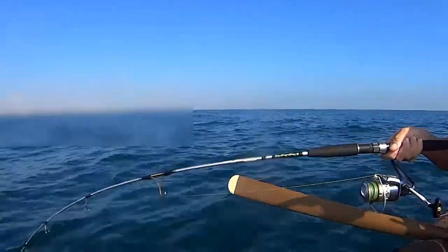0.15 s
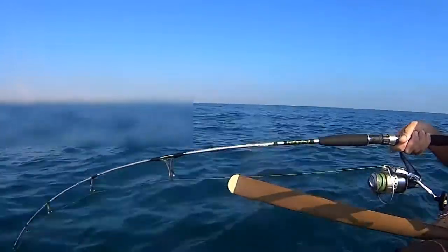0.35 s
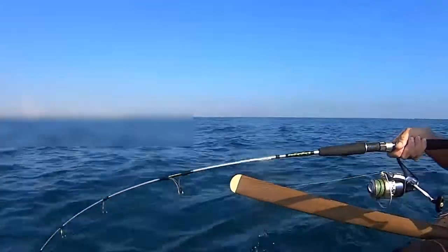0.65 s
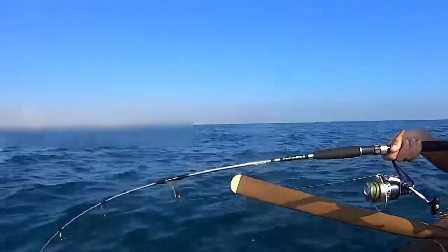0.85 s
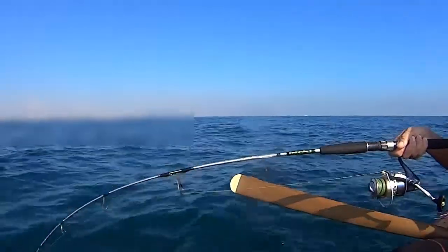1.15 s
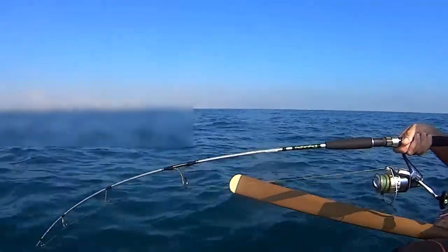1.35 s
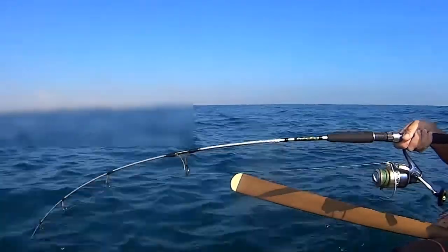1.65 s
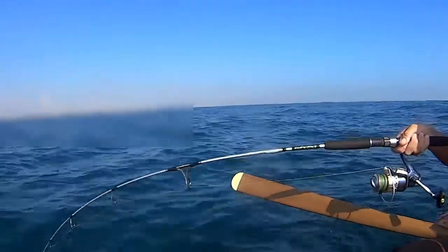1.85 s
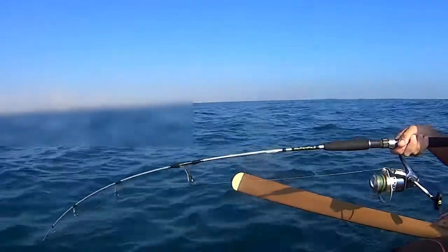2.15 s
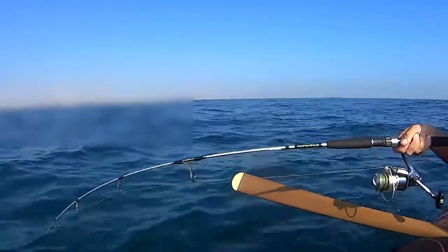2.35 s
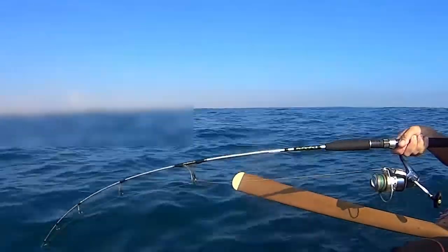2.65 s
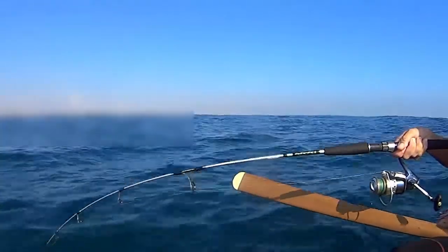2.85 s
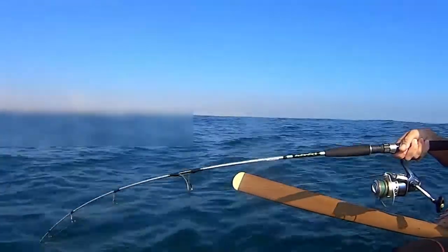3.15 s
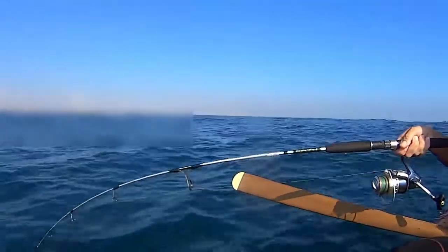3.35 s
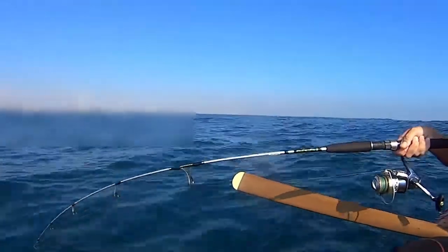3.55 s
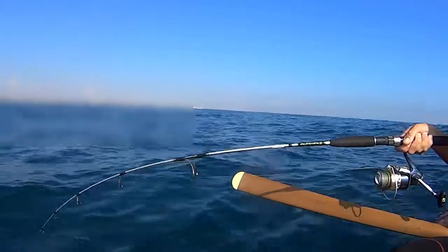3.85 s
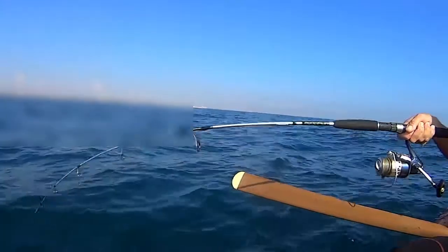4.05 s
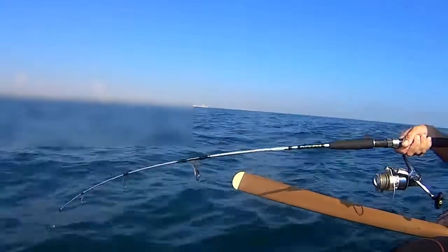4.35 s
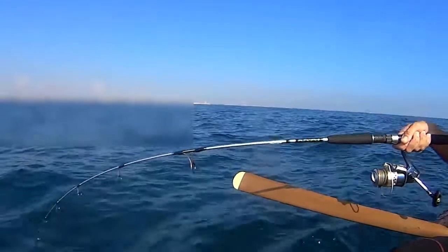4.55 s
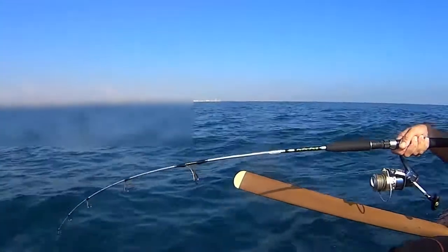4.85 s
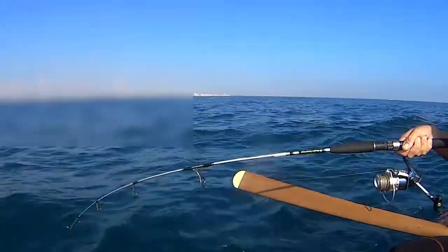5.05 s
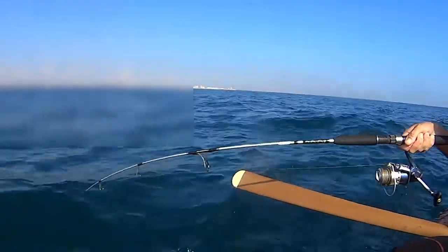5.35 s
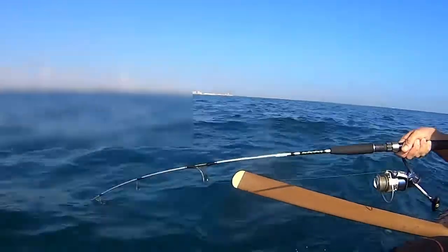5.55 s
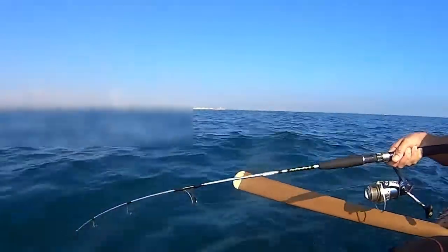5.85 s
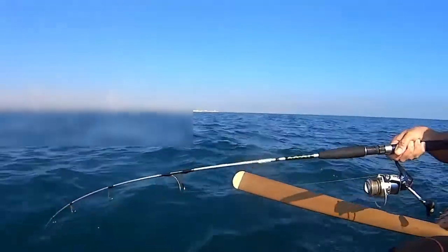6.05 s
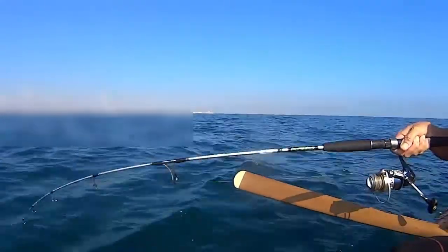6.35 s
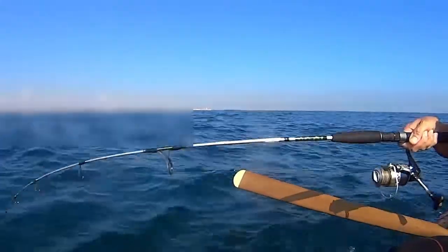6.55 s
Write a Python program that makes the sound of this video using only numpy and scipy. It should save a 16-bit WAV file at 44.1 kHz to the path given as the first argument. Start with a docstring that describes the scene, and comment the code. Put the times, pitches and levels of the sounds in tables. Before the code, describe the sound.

A fishing reel's drag buzzes in uneven metallic runs on a kayak at sea, with hollow plastic knocks, small water laps and drips.

```python
"""A drag clicker buzzes in runs as a fish strips line from a spinning reel on a kayak at sea.
The pull on the line drives the ringing spool, the rasping frame and the snapping clicker tongue.
Close to the microphone of a small cased camera on the hull, wavelets and gear knock the hollow plastic,
modelled as struck modes; random slaps make the lapping, gliding tones the drips, banded noise a faint hiss."""
import sys
import numpy as np
from scipy import signal
from scipy.io import wavfile
from scipy.ndimage import uniform_filter1d

SR = 44100
rng = np.random.default_rng(int(sys.argv[2]) if len(sys.argv) > 2 else 0)


def digitize_waveform(pressure):
    """Quantize a signal to 16-bit integers and store it at the path in sys.argv[1].

    Rows of a 2-D input are taken as channels; values are limited to [-1, 1].
    """
    field = np.atleast_2d(pressure).T
    bounded = np.clip(field, -1, 1)
    quanta = np.round(bounded * 32767).astype(np.int16)
    wavfile.write(sys.argv[1], SR, quanta)


def attenuation_scalar(level_db):
    """Turn a level in dB into a linear amplitude multiplier (20 dB per decade)."""
    decades = np.asarray(level_db, float) / 20
    return 10 ** decades


N = 295911

# low modes of the spool: hz, width_hz (of the narrower resonance), level_db
SPOOL_MODES = [(1342.6, 47, -4.5), (1700, 78, 8), (1830, 51, -4), (1600, 45, -4)]
# knocks on the hull: start_s, peak_db, place (1 belly, 2 wall, 3 rim, 4 edge),
# loss_db (per region away from the place), contact_t60_s (held to 0.005-0.3)
HULL_KNOCKS = [(0.038, -40.5, 2.83, 11, .13), (0.315, -43.5, 0.97, 2, 0.13), (0.332, -38.5, 1.26, 8, 0.039),
               (0.624, -50.5, 2.5, 0, .027), (0.688, -43, 1.3, 2, 0.073), (0.793, -42, 3, 9.5, 0.21),
               (0.922, -49.5, 0.73, 1.5, 0.16), (1.038, -47, 2.3, 8, 0.37),
               (1.129, -35.5, 1.54, 3.5, 0.034), (1.391, -33, 1.63, 9, 0.1), (1.502, -18, 0.56, 10, 0.076),
               (1.804, -29.5, 1.1, 6, 0.041), (2.406, -51, 1.8, 8, 0.063), (2.656, -36.5, 2.6, 3, 0.03),
               (2.729, -41, 1.9, 7, .05), (2.847, -55, 1, 10, 0.17), (3.084, -40, 2, 2, 0.041),
               (3.209, -31.5, 1.23, 3.5, 0.085), (3.277, -12, 1.7, 4.5, 0.16),
               (3.318, -18.5, 2.5, 8.5, 0.09), (3.342, -24, 2.25, 9.5, 0.085),
               (3.367, -24, 2.63, 9.5, 0.029), (3.514, -27.5, 1.77, 6, 0.058),
               (3.63, -31, 2.29, 14.5, 0.017), (3.739, -45, 2.7, 9, 0.13), (3.805, -10, 2.8, 9.5, 0.025),
               (3.917, -28, 1.94, 6, 0.12), (4.09, -42, 2.1, 6, 0.07), (4.207, -27, 1.83, 11.5, 0.097),
               (4.282, -28.5, 1.82, 14, 0.014), (4.362, -37.5, 3.47, 9, 0.037),
               (4.398, -34, 1.98, 14.5, 0.029), (4.436, -57.5, 1, 10, .15), (4.471, -26, 1.23, 10.5, 0.04),
               (4.58, -44, 1.8, 14, 0.036), (4.664, -37.5, 2.1, 3.5, 0.068), (4.724, -35.5, 3.46, 9, 0.13),
               (5.031, -49.5, 1, 8, 0.043), (5.075, -39.5, 2.52, 15, 0.23), (5.232, -32, 1.44, 7, 0.069),
               (5.418, -50.5, 2.8, 10, .068), (5.558, -57.5, 0.75, 3.5, 0.42),
               (5.649, -47.5, 1.6, 6.5, 0.068), (5.936, -45.5, 3.3, -0.5, 0.038),
               (5.994, -41.5, 0.77, 6, .058), (6.024, -19.5, 2.86, 13.5, 0.014),
               (6.035, -24.5, 2.08, 9, 0.058), (6.134, -29.5, 1.53, 5.5, 0.13), (6.177, -43, 3.6, 1.5, .05),
               (6.198, -33.5, 1.45, 8, 0.073), (6.285, -41.5, 1.9, 6, .04), (6.303, -50, 3.8, -2.5, .04),
               (6.325, -34.5, 1, 9, 0.06), (6.45, -47, 3.6, 1.5, 0.054), (6.7, -37, 1.2, 6.5, .094)]
# lowest modes of the whole hull: hz, level_db, t60_s, likeness (left to right, 0-1)
HULL_BOOM = [(36, -9, .12, .7), (62, -9, .2, .85), (90, -1, .22, .87), (101, 0, .22, .87),
             (127, -3, .18, .9)]
# sign of the side signal: left, right
SIDE_SIGNS = [
    [1],
    [-1],
]


def rms_one(x):
    """Scale to unit rms."""
    return x / np.sqrt(np.mean(x ** 2) + 1e-20)


def at_hz(points, hz):
    """Read a table on a log-frequency axis."""
    point_hz, value = np.array(points).T[:2]
    return np.interp(np.log(hz), np.log(point_hz), value)


def drift(rate_hz):
    """Slow random wander of spread 1: noise through two equal poles, made at SR / 20."""
    r = np.exp(-40 * np.pi * rate_hz / SR)
    white = rng.standard_normal(N // 20 + 3002)
    slow = signal.lfilter([1], [1, -2 * r, r * r], white)[3000:]   # the filter has settled
    return np.interp(np.arange(N) / 20, np.arange(len(slow)), rms_one(slow))


def resonate(x, hz, width_hz):
    """Two-pole resonance, gain 1 on top."""
    r = np.exp(-np.pi * width_hz / SR)
    gain = (1 - r * r) / 2
    return signal.lfilter(np.array([1, 0, -1]) * gain, [1, -2 * r * np.cos(2 * np.pi * hz / SR), r * r], x)


def spread(mid, side, alike):
    """Two channels whose likeness is set by the share of an unrelated side signal."""
    alike = np.clip(alike, -.99, .99)
    signs = np.reshape(SIDE_SIGNS, (2,) + (1,) * mid.ndim)
    return np.sqrt((1 + alike) / 2) * mid + np.sqrt((1 - alike) / 2) * side * signs


def add(out, sounds, times):
    """Lay short stereo sounds at their times."""
    for k, s in enumerate(times):
        i = round(s * SR)
        part = sounds[:, k, :N - i]
        out[:, i:i + part.shape[1]] += part


def grains(per_s, scatter_db):
    """Random clicks of uneven size and sign, for mid and side."""
    size_db = scatter_db * np.minimum(rng.exponential(1, (2, N)), 4)
    sizes = attenuation_scalar(size_db) * rng.choice([-1, 1], (2, N))
    return sizes * (rng.random((2, N)) < per_s / SR) + 1e-18


def banded(white, spectrum, likeness, patchy_db):
    """Half-octave bands, each with its own level, flicker and likeness; rms 1."""
    out, edges = 0, 22 * 2 ** np.arange(0, 9.9, .5)
    for k, (low, high) in enumerate(zip(edges, edges[1:])):
        band = signal.butter(2, [low, high], "band", fs=SR, output="sos")
        mid, side = signal.sosfilt(band, white[k % 2])   # neighbouring bands use unrelated sources
        hz = np.sqrt(low * high)
        level_db = at_hz(spectrum, hz) + patchy_db * drift(11.1)
        out = out + attenuation_scalar(level_db) * spread(mid, side, at_hz(likeness, hz))
    return rms_one(out)


def drag_runs():
    """The pull on the line sets the ring, the rasp and how fast the teeth pass, run by run."""
    # runs of the drag, each from first slip to stop: time_s, pull_db (drive of the spool ring)
    runs = [
        [(0.0, -48), (0.07, -58), (0.134, -63.5), (0.24, -60.5), (0.262, -68), (0.318, -56.5), (0.39, -58),
         (0.47, -68)],
        [(0.672, -55), (0.9, -53.5), (1.062, -56.5), (1.1, -53), (1.212, -55), (1.302, -48), (1.618, -48),
         (1.68, -56.5), (1.79, -62)],
        [(1.935, -56), (1.99, -50), (2.052, -57.5), (2.22, -65)],
        [(2.91, -62), (3.0, -57.5), (3.08, -62.5), (3.15, -64), (3.22, -57), (3.29, -53.5), (3.37, -49),
         (3.984, -47), (4.07, -68)],
        [(4.1, -58.5), (4.135, -49.5), (4.22, -58), (4.25, -70)],
        [(4.31, -55.5), (4.37, -49.5), (4.445, -55.5), (4.475, -69.5), (4.53, -58), (4.62, -63.5),
         (4.66, -68.5)],
        [(5.09, -61.5), (5.176, -64.5), (5.274, -58.5), (5.35, -73.5)],
        [(5.455, -72), (5.498, -55), (5.55, -69)],
        [(5.853, -58), (5.872, -53), (5.93, -75.5)],
    ]
    start_s, stop_s = 0.0076, 0.0086   # each run starts and stops almost at once
    reference_pull_db = -55
    reference_teeth_per_s, speed_follows = 250, 1.5   # at the reference pull; share of the pull's swing
    rasp_db, rasp_follows = -58.5, 1.13   # drive at the reference pull; share of the pull's swing
    rasp_lag_db, rasp_lag_s = -12.5, 0.013   # the rasp is held back until the spool is up to speed
    t = np.arange(N) / SR
    ring, rasp, teeth_per_s = np.zeros((3, N))
    for run in runs:
        s, pull_db = np.transpose(run)
        swing_db = np.interp(t, s, pull_db) - reference_pull_db
        age = np.maximum(t - s[0], 0)
        turning = np.clip(age / start_s, 0, 1) * np.clip((s[-1] - t) / stop_s, 0, 1)
        ring += turning * attenuation_scalar(reference_pull_db + swing_db)
        teeth_per_s += turning * reference_teeth_per_s * attenuation_scalar(speed_follows * swing_db)
        held_back_db = rasp_lag_db * np.exp(-age / rasp_lag_s)
        rasp += turning * attenuation_scalar(rasp_db + rasp_follows * swing_db + held_back_db)
    return ring, rasp, teeth_per_s


def spool(ring):
    """Dense random clicks, as strong as the pull, ring the low modes of the spool."""
    teeth = grains(1500, scatter_db=3.0) * attenuation_scalar(0.5 * drift(51))   # the drag slips in fits
    teeth /= np.std(teeth)
    body = 0
    for k, (hz, width_hz, db) in enumerate(SPOOL_MODES):
        mid, side = resonate(resonate(teeth * ring, hz, 4.5 * width_hz), hz, width_hz)
        body = body + attenuation_scalar(db) * spread(mid, side, 0.92) * (-1) ** k
    return attenuation_scalar(21.0) * body


def frame(rasp):
    """Finer clicks rasp the thin modes of clicker and frame, over one broad resonance."""
    # thin modes: hz, width_hz (broadened 3.32 times in use), level_db (taken relative to the strongest)
    frame_modes = [(2790, 156, 2.5), (3587, 84, 7.5), (3992, 117, 9.5), (4617, 24, 8.5), (4990, 24.5, 9),
                   (5410, 14.5, 9.5), (6210, 18, 4), (7700, 98, -6), (8910, 75, -60), (9300, 120, -22),
                   (10800, 160, -36), (12800, 25, -8), (13400, 62, -29), (13900, 36, -36)]
    fine = grains(4000, scatter_db=2.0) * attenuation_scalar(0.18 * drift(28))
    fine /= np.std(fine)
    top_db = max(db for hz, width_hz, db in frame_modes)
    thin = 0
    for hz, width_hz, db in frame_modes:
        shifting_db = 2.73 * drift(6.1)   # each mode comes and goes as the clicker shifts on its seat
        mid, side = resonate(fine * rasp, hz, 3.32 * width_hz)
        thin = thin + attenuation_scalar(db - top_db + shifting_db) * spread(mid, side, 0.21)
    broad = spread(*resonate(fine * rasp, 3000, 3100), 0.15)
    return attenuation_scalar([[11.0], [12.5]]) * thin + attenuation_scalar(-20.0) * broad   # thin modes: left, right dB


def tongue(teeth_per_s):
    """At low speed the single teeth can be told apart, as short bright snaps."""
    # modes of the clicker tongue: hz, width_hz (of the narrower resonance), level_db
    tongue_modes = [(5450, 380, 0), (4550, 450, -6)]
    tooth_db, tooth_scatter_db = -25, 2.0   # drive of a full snap
    full_snap_per_s = 110   # towards and above this speed the tongue no longer springs fully back
    uneven_per_s = teeth_per_s * attenuation_scalar(0.91 * drift(40))
    passed = np.diff(np.floor(np.cumsum(uneven_per_s) / SR), prepend=0)
    size = attenuation_scalar(tooth_db + tooth_scatter_db * rng.standard_normal(N))
    snaps = passed * size / (1 + teeth_per_s / full_snap_per_s) + 1e-18
    rung = 0
    for hz, width_hz, db in tongue_modes:
        rung = rung + attenuation_scalar(db) * resonate(resonate(snaps, hz, 3.0 * width_hz), hz, width_hz)
    return attenuation_scalar([[-.7], [.7]]) * rung


def reel():
    """Harder pull rings the spool, rasps the frame and turns the teeth faster past the tongue."""
    ring, rasp, teeth_per_s = drag_runs()
    return spool(ring) + frame(rasp) + tongue(teeth_per_s)


def wash():
    """Level of the water stirred by knocks: it swells shortly after each and dies away."""
    wash_db, rise_s, t60_s = -30.5, 0.01, 0.53   # drive relative to the knock's peak, swell, dying
    s, peak_db = np.transpose(HULL_KNOCKS)[:2]
    level = np.zeros(N)
    level[(s * SR).astype(int)] = attenuation_scalar(peak_db + wash_db)
    fall, rise = attenuation_scalar(-60 / (t60_s * SR)), np.exp(-1 / (rise_s * SR))
    dying = signal.lfilter([1], [1, -fall], level + 1e-18)
    return signal.lfilter([1 - rise], [1, -rise], dying)


def lapping():
    """Small slaps of water colour the hull; the swell keeps its lowest modes humming."""
    # how hard the water works at the hull: time_s, level_db
    water_work = [(0.0, -50.5), (0.3, -72), (0.45, -54), (0.56, -63), (1.3, -61), (2.1, -64), (2.45, -69),
                  (2.9, -70), (3.2, -58), (4.3, -60), (4.66, -50.5), (4.85, -62), (5.3, -64), (5.9, -64.5),
                  (6.17, -57.5), (6.45, -62.5), (6.71, -67)]
    # relative spectrum of the slaps: hz, level_db (per Hz)
    slap_spectrum = [(40, -11), (150, -3.5), (240, 6), (400, -3), (700, -5), (1200, -7.5), (2000, -11.5),
                     (3500, -32)]
    hum_db, hum_follows, hum_wander_db = -71, 0.78, 6   # at calm lapping; share of its swing; wander
    calm_db = -62
    s, lap_db = np.transpose(water_work)
    lap_db = np.interp(np.arange(N) / SR, s, lap_db)
    slaps = np.array([grains(250, scatter_db=0.5), grains(250, scatter_db=-1.5)])
    likeness = [(150, 1.0), (300, 0.1), (700, 0.079), (1500, 0.75)]   # (Hz, left-right likeness)
    laps = banded(slaps, slap_spectrum, likeness, patchy_db=6.0)
    swell = rng.standard_normal((2, N))
    hum = 0
    for hz, db, t60, alike in HULL_BOOM:
        hum = hum + attenuation_scalar(db) * spread(*resonate(swell, hz, 11.5), alike)
    level_db = hum_db + hum_follows * (lap_db - calm_db) + hum_wander_db * drift(2.8)
    return (attenuation_scalar(lap_db) + wash()) * laps + attenuation_scalar(level_db) * rms_one(hum)


def hiss():
    """Steady noise of sea and microphone, shaped in slightly flickering bands."""
    # relative spectrum: hz, level_db (per Hz)
    hiss_spectrum = [(12, -30), (20, 4.5), (102, -15.5), (169, -43), (317, -3), (424, -6.5), (537, -3),
                     (934, -9.5), (1180, -6.5), (1390, -10), (2290, -10), (2970, -13), (10800, -21.5),
                     (14000, -66), (22000, -120)]
    # stereo image: hz, likeness (left to right, -1 to 1)
    hiss_likeness = [(60, 1), (150, -0.84), (380, -0.3), (950, -0.65), (2380, -0.56), (5980, 0.19),
                     (15000, 0.73)]
    white = rng.standard_normal((2, 2, N))
    return attenuation_scalar(-58.5) * banded(white, hiss_spectrum, hiss_likeness, patchy_db=1.2)


def catches():
    """A hard catch swells over a few ms, then rings out near the main spool mode."""
    # single hard catches of the clicker: start_s, peak_db (left; the right is 0.95 of it)
    hard_catches = [(0.023, -40), (0.0586, -38.5), (0.157, -42), (0.168, -45), (0.2213, -39.5),
                    (0.232, -43.5), (0.298, -43), (0.8566, -39), (1.0563, -37), (1.1574, -34.5),
                    (1.2503, -32.5), (1.2946, -33), (1.3593, -35), (1.488, -37.5), (1.5473, -40),
                    (1.5558, -31.5), (1.599, -29), (1.731, -41), (2.1107, -40.5), (2.1926, -42.5),
                    (3.466, -34), (3.5037, -34.5), (3.6194, -39.5), (3.714, -43), (3.754, -41),
                    (4.131, -38.5), (4.3637, -41), (5.1536, -43), (5.516, -47.5)]
    swell_s = .004
    s, peak_db = (c[:, None] for c in np.transpose(hard_catches))
    t, out = np.arange(3000) / SR, np.zeros((2, N))
    hz = SPOOL_MODES[1][0] * (1 + 0.015 * rng.standard_normal(s.shape))
    shape = t / swell_s * np.exp(1 - t / swell_s)
    sound = attenuation_scalar(peak_db) * shape * np.sin(2 * np.pi * hz * t)
    add(out, np.array([1, .95])[:, None, None] * sound, s[:, 0])
    return out


def strike(s, contact_t60, parts, size):
    """A first blow, then a dying burst of pushes; each part of a body rings with its modes up to its peak."""
    t, out = np.arange(size) / SR, np.zeros((2, N))
    chance = rng.standard_normal((len(s), 2, size)).transpose(1, 0, 2)
    age = t / np.clip(contact_t60, .005, .3)[:, None]
    # the pushes die away steadily from the first instant, 60 dB down at the contact t60
    push = chance * np.abs(chance) * attenuation_scalar(-60 * age ** 1.077) + 1e-18
    push[..., :20] += 2.12 * np.hanning(20)
    for modes, peak_db, left_db in parts:
        rung, strength = 0, rng.standard_normal((len(s), len(modes)))
        for k, (hz, level_db, t60, alike) in enumerate(modes):
            # a mode feels only pushes near its pitch
            near = signal.butter(2, [hz / 1.34, hz * 1.037], "band", fs=SR, output="sos")
            width_hz = np.log(1000) / (np.pi * t60)
            mid, side = resonate(signal.sosfilt(near, push), hz, width_hz)
            gain = attenuation_scalar(level_db + 3.02 * strength[:, k, None]) * np.sqrt(t60)
            rung = rung + gain * spread(mid, side, alike)
        loudest = np.abs(rung.mean(axis=0)).max(axis=1)
        rung *= (attenuation_scalar(peak_db) / loudest)[:, None]
        add(out, rung * attenuation_scalar(left_db * np.array(SIDE_SIGNS)[..., None]), s)
    return out


def knocks():
    """A knock rings its own region of the hull, the others by distance; the belly lies to the right."""
    # hull modes by region, each table: hz, level_db, t60_s, likeness (left to right, 0-1)
    belly_modes = [(165, -9, .06, .95), (205, -3, .05, .85), (248, 0, .065, .25), (300, -4, .045, .2),
                   (355, -3, .05, .3), (395, -6, .045, .3), (470, -8, .04, .5)]
    wall_modes = [(520, -5, .035, .6), (575, -2, .035, .6), (650, 0, .04, .6), (700, 0, .045, .6),
                  (745, -2, .04, .7), (835, -1, .055, .75), (930, -8, .03, .75)]
    rim_modes = [(1030, 0.5, 0.0093, 0.99), (1120, 7, 0.062, 0.87), (1203, 3, 0.13, 0.88),
                 (1417, 4, 0.049, 0.85), (1600, 5, 0.034, 0.96)]
    edge_modes = [(1800, -3, .025, .8), (2000, -1, .03, .75), (2300, -2, .025, .75), (2560, 0, .035, .75),
                  (2800, -2, .025, .7), (3150, -12, .015, .7)]
    s, peak_db, place, loss_db, contact_t60 = np.transpose(HULL_KNOCKS)
    # (modes, left dB; the right gets the opposite)
    regions = [(belly_modes, -1.8), (wall_modes, .4), (rim_modes, .2), (edge_modes, .8)]
    parts = []
    for k, (modes, left_db) in enumerate(regions):
        distance = np.abs(k + 1 - place)
        parts.append((modes, peak_db - loss_db * distance, left_db))
    return strike(s, contact_t60, parts, size=6000)


def bubble_tones(level_db, start_hz, end_hz, length_s):
    """A bubble swells fast and dies, its pitch gliding as it nears the surface."""
    age = np.arange(3000) / SR / length_s
    pitch = start_hz + (end_hz - start_hz) * np.minimum(age, 1.2)
    waver = uniform_filter1d(rng.standard_normal(age.shape), size=150)
    pitch = pitch * (1 + .5 * waver)   # the pitch wavers on moving water
    swell = age / 0.24 * np.exp(1 - age / 0.3)
    tone = attenuation_scalar(level_db) * swell * np.sin(2 * np.pi * np.cumsum(pitch, axis=1) / SR)
    pan_db = rng.uniform(-2.5, 3.4, level_db.shape)
    return np.array([tone * attenuation_scalar(pan_db), tone * attenuation_scalar(-pan_db)])


def drips():
    """The clear drips, and a scatter of faint ones."""
    # clear drips and bubbles: start_s, level_db (before swell and pan), start_hz, end_hz,
    # length_s (time scale of swell and glide)
    clear_drips = [(0.283, -54, 1120, 1090, .013), (0.434, -49, 1030, 1120, 0.03),
                   (0.474, -39, 1120, 1140, 0.013), (0.502, -49.5, 1484, 1564, 0.022),
                   (0.535, -51.5, 690, 680, 0.013), (0.622, -47, 2390, 2790, 0.0073),
                   (0.797, -52, 2050, 2130, .016), (1.572, -46.5, 1150, 1480, 0.042),
                   (2.37, -54, 1430, 1590, .01), (2.373, -56, 574, 600, .03),
                   (2.389, -60, 1230, 1180, 0.028), (2.836, -55.5, 1090, 1040, 0.017),
                   (4.16, -47.5, 2360, 2520, 0.013), (4.721, -45.5, 1304, 1540, 0.019),
                   (4.77, -54.5, 670, 656, 0.02), (4.782, -57, 1180, 1200, 0.02),
                   (4.888, -40, 1600, 1810, .013), (4.94, -53, 2160, 2050, .0074),
                   (4.943, -57.5, 1360, 1500, 0.022), (5.109, -50.5, 2750, 2670, 0.0073),
                   (5.116, -42.5, 1600, 1580, 0.014), (5.167, -59, 2500, 2620, 0.0077),
                   (5.215, -44.5, 1160, 1630, 0.021), (5.25, -42.5, 1290, 1770, 0.015),
                   (5.297, -49.5, 1200, 1190, 0.017), (5.326, -52.5, 865, 1440, 0.02),
                   (5.344, -57.5, 2700, 2650, 0.0063), (5.56, -46.5, 1680, 1600, 0.0079),
                   (5.591, -55.5, 1095, 1450, 0.018), (5.61, -53, 1600, 1540, 0.011),
                   (5.626, -48.5, 1700, 1650, 0.021), (5.721, -57.5, 1380, 1410, .016),
                   (5.777, -57, 1700, 1700, .014), (5.894, -49, 1370, 1250, 0.006),
                   (6.096, -51, 1490, 1770, 0.013), (6.16, -35, 1210, 1270, 0.009),
                   (6.172, -37.5, 1320, 1700, 0.013), (6.325, -48, 1210, 1195, 0.015),
                   (6.377, -52, 1260, 1480, 0.028), (6.573, -53, 1660, 1670, .014),
                   (6.682, -58, 1310, 1460, 0.02)]
    s, *shape = (c[:, None] for c in np.transpose(clear_drips))
    out = np.zeros((2, N))
    add(out, bubble_tones(*shape), s[:, 0])
    when, loud, pitch, glide, span = rng.random((150, 5)).T[..., None]
    start_hz = 500 * 2 ** (2.3 * pitch)
    end_hz = start_hz * (.97 + 0.202 * glide ** 2)
    faint = bubble_tones(-66 + 9 * loud, start_hz, end_hz, 0.0041 + 0.015 * span)
    add(out, faint, when[:, 0] * (N - 1) / SR)
    return out


def knock_booms():
    """Struck with the knocks, the lowest hull modes hang on."""
    # low part of the knocks: start_s, peak_db
    low_parts = [(0.333, -52), (0.621, -58.5), (1.14, -50), (1.496, -51), (1.805, -45), (3.098, -66),
                 (3.28, -27.5), (3.317, -32), (3.416, -44), (3.517, -48.5), (3.803, -40.5), (3.921, -45.5),
                 (4.09, -59.5), (4.222, -61.5), (4.483, -51.5), (4.599, -52.5), (4.728, -48),
                 (5.227, -46.5), (5.561, -45), (5.618, -50.5), (6.013, -47), (6.145, -48), (6.325, -47.5)]
    s, peak_db = np.transpose(low_parts)
    contact_t60_s = np.full(len(s), 0.15)
    return strike(s, contact_t60_s, [(HULL_BOOM, peak_db, -.4)], size=14000)


def knock_tops():
    """The bright top of the hard knocks: a short contact rings quickly dying high modes."""
    # bright top of the hard knocks: start_s, peak_db
    bright_tops = [(0.607, -47), (1.803, -51), (2.6584, -53), (3.0838, -47.5), (3.2787, -39.5),
                   (3.2902, -37.5), (3.8068, -34.5), (4.665, -52), (4.725, -43.5), (5.9385, -46.5),
                   (6.0257, -46), (6.037, -45), (6.132, -53), (6.451, -54)]
    # modes of the bright top: hz, level_db, t60_s, likeness (left to right, 0-1)
    top_modes = [(3160, -4, 0.0032, 0.39), (4370, 0.5, 0.019, .6), (5290, 0, .01, 0.31),
                 (7000, -3, 0.0049, .6), (9030, -2, 0.0021, 0.55), (13170, -4, 0.0015, 0.61)]
    s, peak_db = np.transpose(bright_tops)
    contact_t60_s = np.full(len(s), 0.028)
    return strike(s, contact_t60_s, [(top_modes, peak_db, .1)], size=3000)


def scene():
    """Reel, water and knocked hull over the hiss of sea and microphone."""
    water = lapping() + drips()
    hull = knocks() + knock_booms() + knock_tops()
    return reel() + water + hiss() + catches() + hull


def band_limit(x):
    """A steep low-pass at the top of the band."""
    return signal.sosfilt(signal.butter(12, 15500, fs=SR, output="sos"), x)


def record(dry):
    """The finished stereo mix, ready to write."""
    return band_limit(dry)


dry = scene()
out = record(dry)
digitize_waveform(out)
```